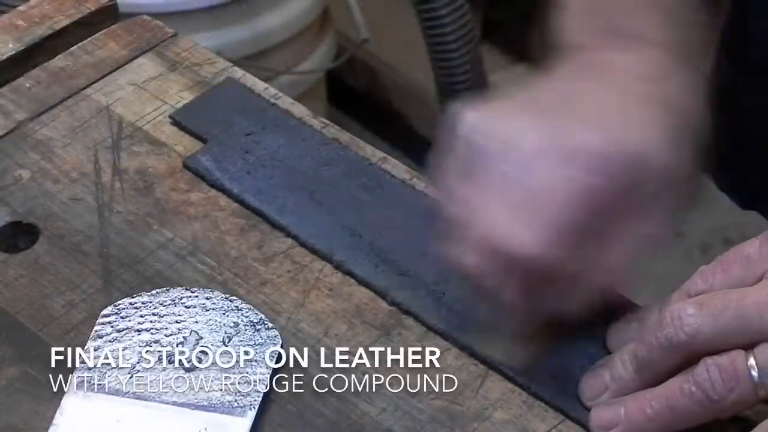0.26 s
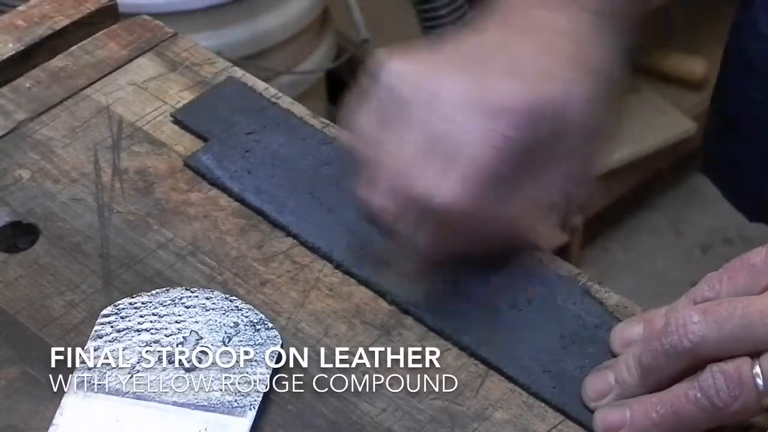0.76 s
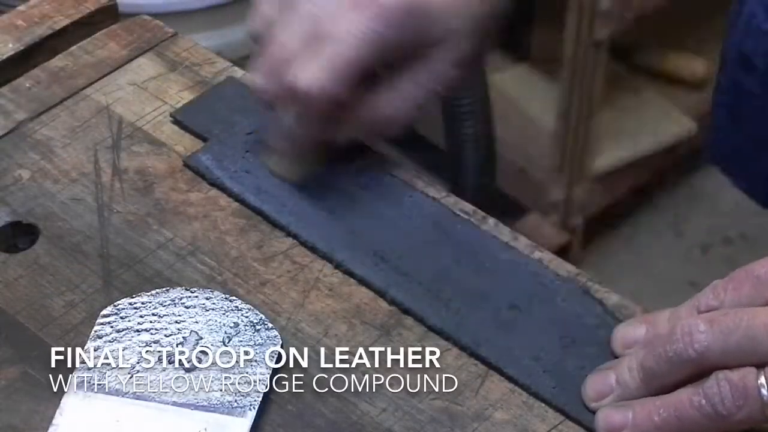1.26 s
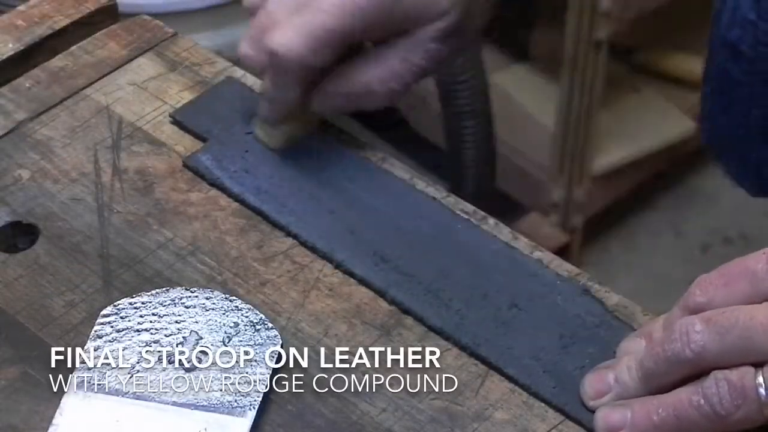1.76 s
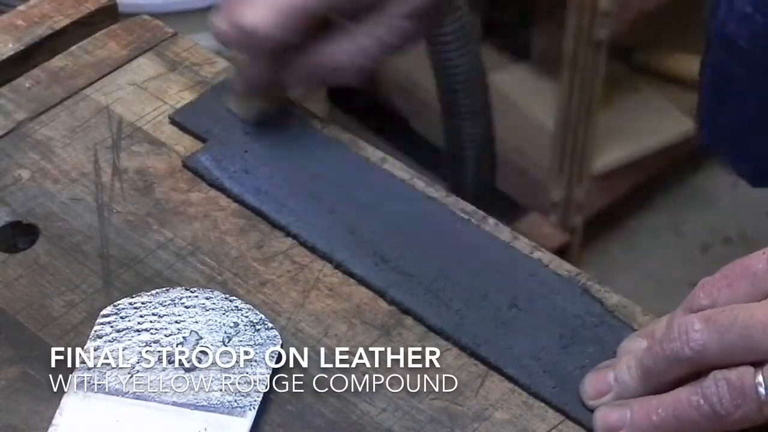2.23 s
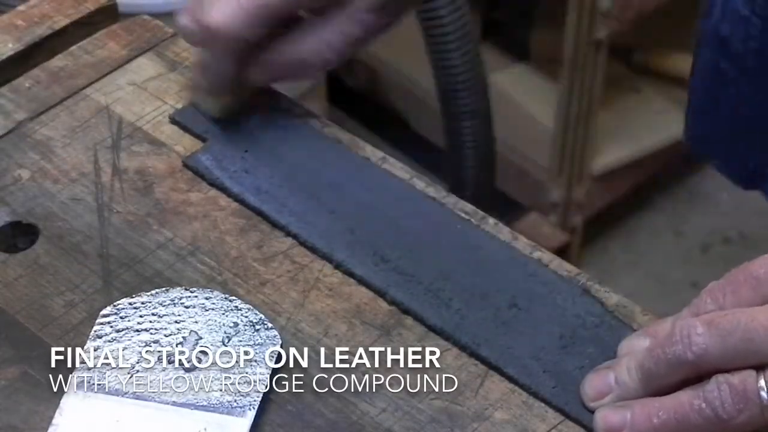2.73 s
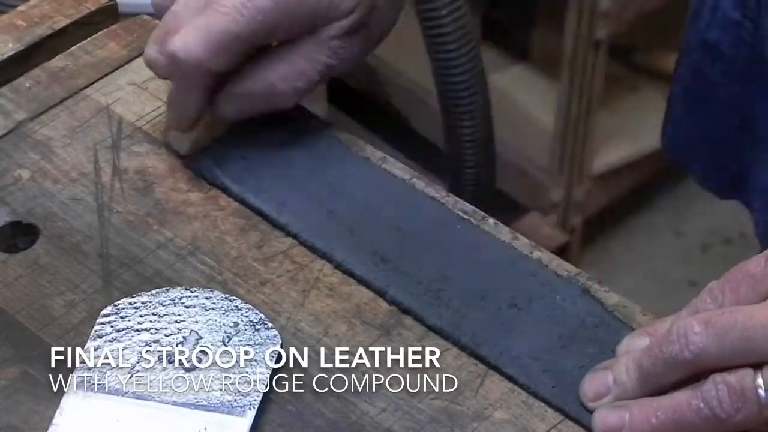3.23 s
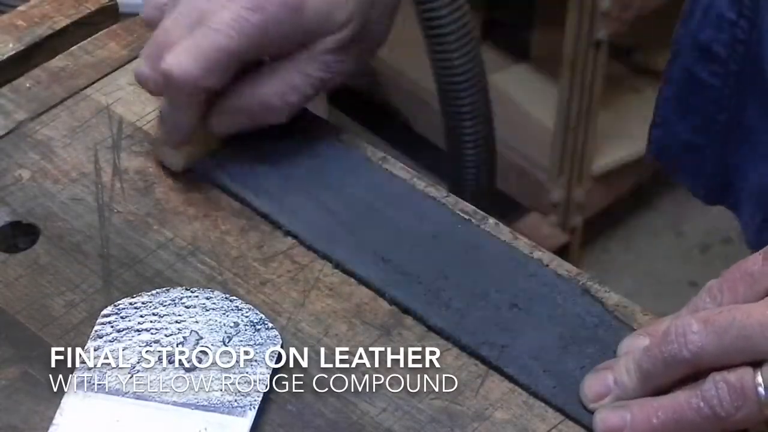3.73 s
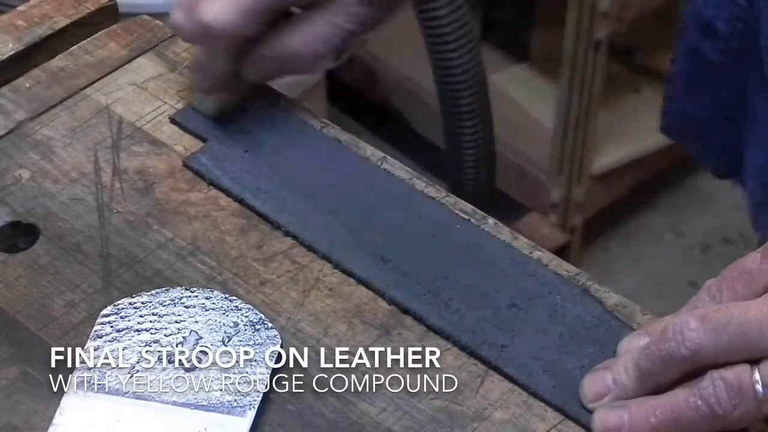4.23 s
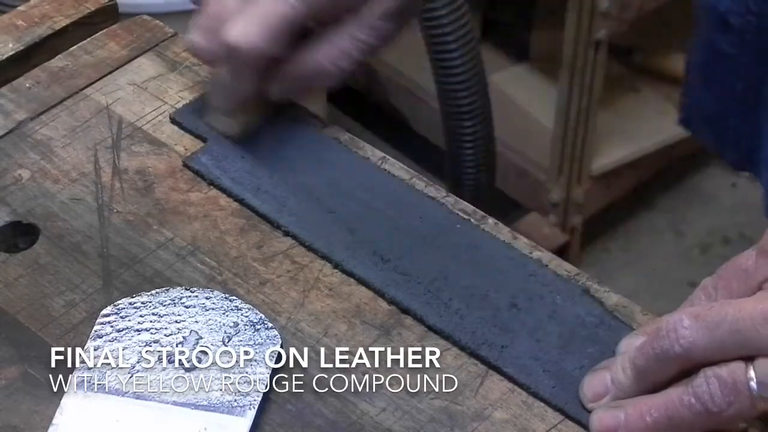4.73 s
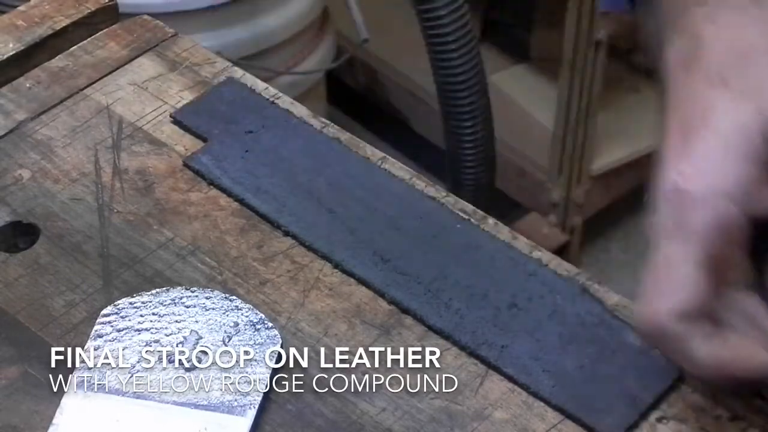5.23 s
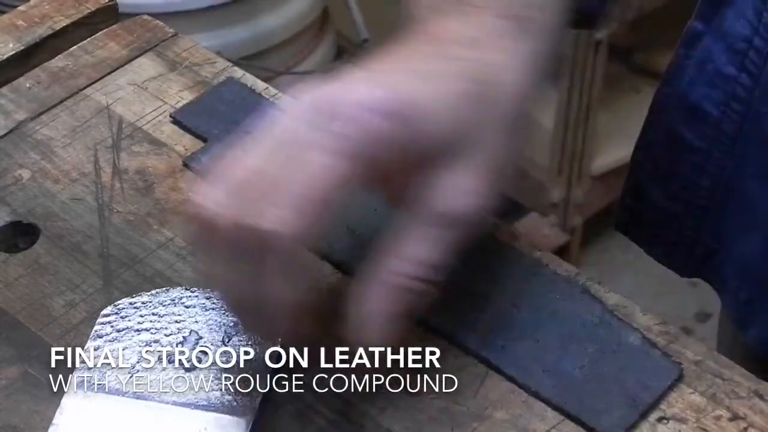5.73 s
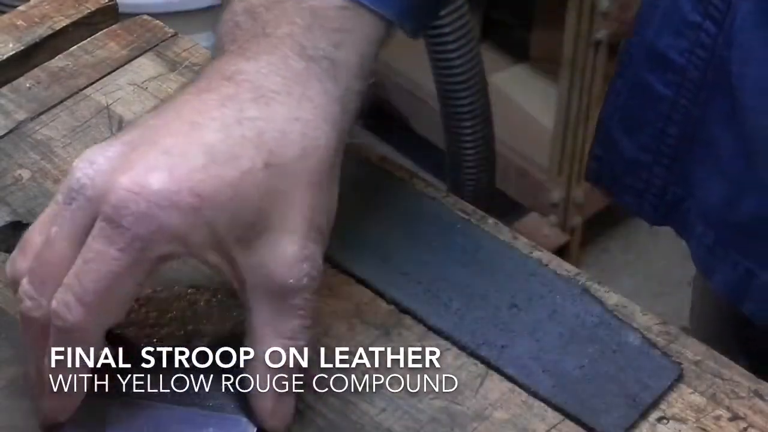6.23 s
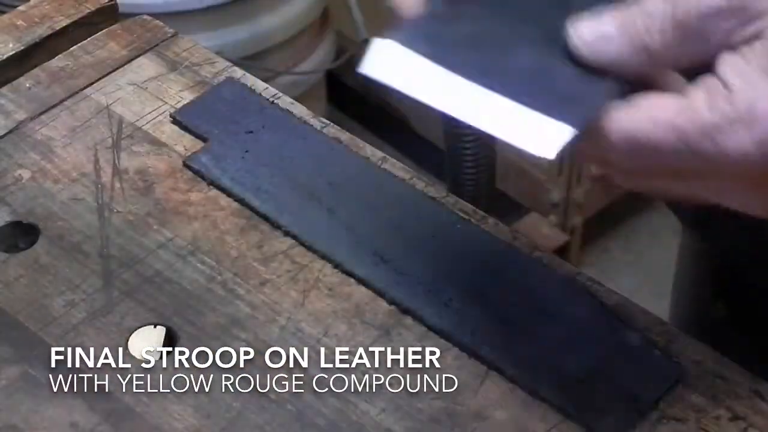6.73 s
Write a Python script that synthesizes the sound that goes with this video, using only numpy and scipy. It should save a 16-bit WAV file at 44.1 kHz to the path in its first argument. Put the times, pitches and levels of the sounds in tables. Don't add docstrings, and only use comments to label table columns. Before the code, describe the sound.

A wax block knocks onto a leather strop about twice a second, each hollow crack followed by a short raspy rub, over steady hum and hiss.

```python
import sys
import numpy as np
from scipy import signal
from scipy.io import wavfile
from scipy.ndimage import uniform_filter1d

SR = 44100
rng = np.random.default_rng(int(sys.argv[2]) if len(sys.argv) > 2 else 0)


def transcribe(signal):
    frames = np.atleast_2d(signal).T
    limited = np.clip(frames, -1, 1)
    pcm = np.round(limited * 32767).astype(np.int16)
    wavfile.write(sys.argv[1], SR, pcm)


def volts(x):
    e = np.asarray(x, float) / 20
    return 10 ** e


N = 307377
TIME = np.arange(N) / SR
EDGES_HZ = 22 * 2 ** np.arange(0, 9.7, .4)

# start in
# seconds, level in dB at each of KNOCK_HZ.
KNOCKS = [(0.7096, -27, -30, -23, -27), (0.951, -81, -41, -45, -56), (1.1138, -34.5, -33, -25, -33),
          (1.542, -32.5, -40.5, -50, -45.5), (2.016, -42.5, -60, -44, -53),
          (2.5272, -29, -27.5, -22.5, -31), (3.003, -27, -26.5, -17.5, -23.5),
          (3.249, -60, -46.5, -49, -54), (3.477, -28, -28, -22.5, -28), (4.0003, -28.5, -26, -25.5, -28.5),
          (4.532, -33.5, -33, -26.5, -45.5), (6.2585, -55, -46.5, -36.5, -57)]
# start in seconds, level in dB at each of CRACK_HZ.
CRACKS = [(0.7097, -22, -18, -22.5, -23), (1.1108, -44, -49, -45, -41), (1.1142, -32, -41, -34.5, -32),
          (1.542, -44, -31.5, -34.5, -33.5), (2.016, -36, -32, -30.5, -28), (2.5255, -43, -39, -33, -36),
          (2.5272, -44, -33, -36, -22.5), (3.003, -26, -21.5, -25.5, -25.5), (3.0046, -22, -25, -27, -26),
          (3.477, -27, -25.5, -31, -28), (3.9988, -29, -54, -42, -47), (4.0005, -41, -33, -26.5, -25),
          (4.5305, -45, -39.5, -45, -46), (4.532, -48, -46, -38, -33)]
# start in seconds, then boom, thud, clack and crack in dB (at BLOW_HZ).
TOUCHES = [(5.775, -48, -38, -37, -46), (5.999, -40, -42.5, -49, -57), (6.01, -58, -46, -49, -75),
           (6.035, -61, -40, -48.5, -41), (6.057, -63, -68, -82, -77), (6.084, -62, -52, -55, -76),
           (6.12, -56, -47.5, -62, -90), (6.144, -57, -56, -91, -74), (6.179, -56, -55, -95, -78),
           (6.287, -60, -71, -87, -75), (6.384, -73, -59.5, -72, -54)]
KNOCK_HZ, CRACK_HZ, BLOW_HZ = [200, 390, 520, 1100], [1400, 2300, 3300, 6000], [190, 450, 1100, 3000]

# pitch in Hz, level in dB, 60 dB decay in seconds.
BENCH = [(156, -3, 0.12), (203.6, 2.5, 0.1), (347.8, -2.5, 0.23), (396.8, 0.5, 0.17), (409.5, -0.5, 0.16),
         (499.2, -0.5, 0.12), (535, -15, 0.024), (716, -4, 0.15), (801, 2, 0.046), (895, -2.5, 0.046),
         (892, -21, 0.26), (1030, -25, 0.034), (1142, -6.5, 0.1), (1251, -0.5, 0.035), (1500, -21, 0.039),
         (1880, -28, 0.41), (2360, -42, 0.062), (2590, -22, 0.2), (2730, -40, 0.13), (3010, -45, 0.09)]
# pitch in Hz, level in dB, 60 dB decay in seconds.
WAX = [(1320, -7, 0.014), (2274, 4, 0.0033), (2810, -20, 0.004), (3400, -20.5, 0.0082), (3950, -8, 0.0069),
       (4900, -10, 0.0069), (6070, -19, 0.0092), (8160, -20, 0.0046), (9260, -21, 0.005)]
# pitch in Hz, level in dB, 60 dB decay in seconds.
TOOL = [(351, -2, 5.0), (670, 5.5, 0.053), (934, -14, 0.25), (1240, 4, 0.046), (1526, -5, 0.15),
        (1910, 1, 0.11), (2040, -14, 0.12), (2240, -22, 0.077), (2580, 5, 0.044), (2800, -18, 0.22),
        (3200, -25, 5.0), (3580, -28, 0.14)]
# pitch in Hz, level in dB, 60 dB decay in seconds.
STROP = [(1131, -2, 0.42), (1236, 4, 0.17), (1544, -18.5, 0.016), (2166, -0.5, 0.093), (3880, -2, 0.033),
         (5820, -2.5, 0.017)]
RING_LATE_S = .0007
BENCH_LATE_S = .0022
RINGS_LOW_HZ = 120

# frequency in Hz, level in dB per Hz.
KNOCK_BODY = [(30, -4), (90, -19), (200, -1), (270, -13), (420, 5.5), (520, -0.5), (620, -8), (800, -9),
              (1110, -4.5), (1600, -23.5), (2600, -12.5), (4000, -23), (7000, -29.5), (12000, -30.5)]
# frequency in Hz, level in dB per Hz.
TOUCH_BODY = [(200, -11.5), (350, -3), (700, -4.5), (1640, -1), (2550, -3.5), (3300, -19), (4300, -41),
              (7000, -50)]
# frequency in Hz, 60 dB decay in seconds.
KNOCK_T60 = [(40, 0.32), (150, 0.51), (500, 0.26), (1500, 0.083), (4000, 0.15), (10000, 0.047)]
# frequency in Hz, left-right likeness from 0 to 1.
SOURCE_ALIKE = [(30, 0.27), (60, 0.5), (250, 0.42), (800, 1), (3000, 0.81), (7000, 0.27), (15000, 0.48)]
LOW_WASH_DB = -8

# start in seconds, length in seconds, hiss in dB, rise from start to end in dB, sag at mid-stroke in dB.
STROKES = [(0.0, 0.12, -47.5, -1, -1.5), (0.237, 0.069, -40.5, 3, -3), (0.404, 0.13, -47, 2, -1.5),
           (0.763, .17, -50.5, 1, -2), (1.181, 0.19, -47.5, 1, 3), (1.61, 0.21, -47.5, -5, 3),
           (2.07, 0.22, -47.5, -1, 3.5), (2.556, 0.2, -46.5, 0.5, 4), (3.045, .21, -50.5, -4, -5),
           (3.543, 0.2, -49.5, -5, -0.5), (4.044, 0.19, -46.5, 0, 5), (4.581, 0.22, -49.5, -3.5, 0)]
# time in seconds, length in seconds, then rasp, scrape and shudder passed into the bench in dB.
BITES = [(0.046, 0.074, -48.5, -55.5, -60), (0.285, 0.056, -43.5, -58, -75), (0.46, 0.063, -48, -57, -61),
         (0.83, 0.11, -51.5, -53.5, -54), (1.247, 0.098, -49, -53.5, -56.5),
         (1.658, 0.1, -50.5, -50.5, -53), (2.17, 0.093, -52.5, -54, -61.5), (2.66, .11, -52, -51.5, -53),
         (3.103, 0.1, -49.5, -50.5, -52), (3.6, .11, -50, -51.5, -52), (4.128, 0.12, -51.5, -51, -52.5),
         (4.648, 0.12, -53, -53, -51)]
# time in seconds, shudder in dB.
JOLTS = [
    (.296, -57),
    (.44, -59),
    (1.385, -52.5),
    (1.83, -80),
    (2.765, -54.5),
    (3.27, -64),
    (3.75, -74),
    (4.25, -59),
    (4.85, -57),
    (4.98, -58),
]
GRIP_DB_PER_S, LIFT_DB_PER_S, ROUND_S = 307, 314, 0.0067
RASP_DROP_DB, SCRAPE_DROP_DB, SHUDDER_DROP_DB = (5, 5.5), (5, 4.5), (6, 5)
RASP_LIFT, SCRAPE_LIFT = 0.71, 0.53
JOLT_S, JOLT_DROP_DB = 0.032, (6, 4)
IDLE_HISS_DB, IDLE_SCRAPE_DB, IDLE_SHUDDER_DB, HANDS_OFF_S = -94.5, -81, -72.5, 4.3
# frequency in Hz, level in dB per Hz.
HISS = [(500, -0.5), (900, -4.5), (1250, -6), (1700, 1), (2300, -4), (3200, -5.5), (4200, 0), (5300, -2),
        (8000, 0), (13000, 0.5), (16000, -2.5)]
# frequency in Hz, left-right likeness from 0 to 1.
RUB_ALIKE = [(600, 0.57), (1400, 0.83), (3000, 0.74), (7000, 0.15), (15000, 0.29)]

# time in seconds, rumble in dB, groan in dB.
SWAYS = [(.33, -68, -63.5), (.8, -70, -59), (1.13, -56, -79), (1.58, -64, -65), (2.05, -68, -85),
         (2.62, -70, -66), (3.1, -63, -59), (3.51, -65, -70), (4.1, -59, -64), (4.6, -65, -82),
         (6.0, -94, -65)]
# frequency in Hz, level in dB per Hz.
ROCK = [(25, -45), (60, 2), (100, 7), (200, -3.5), (280, -20)]
ROCK_REST_DB, SWAY_S, SWAY_DROP_DB = -78.5, 0.15, (14.5, 7)
# time in seconds, hum in dB.
HUM = [
    (0, -60.5),
    (.6, -63.5),
    (.74, -55),
    (1.7, -56.5),
    (2.3, -63.5),
    (2.6, -56),
    (4.95, -56),
    (5.1, -62),
    (6.97, -61),
]
# frequency in Hz, level in dB per Hz.
AIR = [(25, -24), (60, -1), (100, 10.5), (160, -9), (250, -11), (310, -0.5), (400, 7.5), (630, 1),
       (1000, -1.5), (2000, 1.5), (4000, 0), (8500, -2), (10500, -5.5), (16000, -5)]
# frequency in Hz, left-right likeness from 0 to 1.
AIR_ALIKE = [(60, 0.48), (180, 0.1), (550, 0.02), (1650, 0.063), (4970, 0.0083), (15000, 0.092)]
AIR_DB, HUM_HZ = -54, 118.4
CUT_HZ, PORT_DIP_HZ = 15750, 7850


def rms_one(x):
    return x / np.sqrt(np.mean(x ** 2) + 1e-20)


def to_db(gain):
    return 20 * np.log10(gain + 1e-6)


def at_hz(points, hz):
    table = np.array(points)
    return np.interp(np.log(hz), np.log(table[:, 0]), table[:, 1])


def drift(rate):
    r = np.exp(-80 * np.pi * rate / SR)
    slow = signal.lfilter([1], [1, -2 * r, r * r], rng.standard_normal(N // 40 + 2002))[2000:]
    return np.interp(np.arange(N) / 40, np.arange(len(slow)), rms_one(slow))


def hump(s, length, drop_db):
    away = (TIME - s) / length
    side_db = np.where(away < 0, drop_db[0], drop_db[1])
    return volts(-side_db * np.minimum(away ** 2, 20))


def ring(drive, hz, t60):
    r, w = volts(-60 / (t60 * SR)), 2 * np.pi * hz / SR
    return signal.lfilter([0, np.sin(w)], [1, -2 * r * np.cos(w), r * r], drive + 1e-18)


def bands(white, low_hz=0, high_hz=SR):
    for k, (low, high) in enumerate(zip(EDGES_HZ, EDGES_HZ[1:])):
        if low_hz < low < high_hz:
            band = signal.butter(2, [low, high], "band", fs=SR, output="sos")
            yield np.sqrt(low * high), signal.sosfilt(band, white[k % 2])


def spread(pair, likeness, hz):
    alike = np.clip(at_hz(likeness, hz), 0, 1)
    mid, side = np.sqrt(1 + alike) * pair[0], np.sqrt(1 - alike) * pair[1]
    return np.array([np.roll(mid + side, int(hz < 5000)), mid - side])


def clicks(events, gains, late_s=0):
    out = np.zeros(N)
    out[[round((row[0] + late_s) * SR) for row in events]] = gains
    return out


def blow_db(events, hz, at=BLOW_HZ):
    return np.array([np.interp(np.log(hz), np.log(at), parts) for s, *parts in events])


def struck(events, modes, strike_db, shudder=0, luck_db=3.5, swell_cycles=8.1, at=BLOW_HZ, late_s=RING_LATE_S, turn=-1):
    out = 0
    luck = rng.standard_normal((len(events), len(modes)))
    for k, (hz, level_db, t60) in enumerate(modes):
        gains = volts(blow_db(events, hz, at) + level_db + strike_db + luck_db * luck[:, k]) * turn ** k
        blows = clicks(events, gains, late_s=late_s)
        evened = 2 * np.log(1000) * hz / (swell_cycles * SR)
        push = ring(blows, hz, swell_cycles / hz) * evened
        out = out + ring(push + volts(level_db) * shudder, hz, np.clip(t60, .004, .2))
    return out


def knock_wash(touch_db, crack_db):
    out = 0
    for hz, pair in bands(rng.standard_normal((2, 2, N)), low_hz=28, high_hz=11000):
        events, at, lift_db = (KNOCKS, KNOCK_HZ, 0) if hz < 1400 else (CRACKS, CRACK_HZ, crack_db)
        blows = clicks(events, volts(blow_db(events, hz, at) + at_hz(KNOCK_BODY, hz) + lift_db))
        blows += clicks(TOUCHES, volts(blow_db(TOUCHES, hz) + at_hz(TOUCH_BODY, hz) + touch_db))
        fall = volts(-60 / (at_hz(KNOCK_T60, hz) * SR))
        rise = np.exp(-hz / (1.3 * SR))
        wash = signal.lfilter([1 - rise], np.convolve([1, -fall], [1, -rise]), blows + 1e-18)
        level_db = 15.5 + LOW_WASH_DB * (120 < hz < 900)
        out = out + volts(level_db) * wash * spread(pair, SOURCE_ALIKE, hz)
    return out


def strokes():
    hiss, off_db = 0, -60.
    for s, length, level_db, rise_db, sag_db in STROKES:
        along = np.clip((TIME - s) / length, 0, 1)
        before, after = np.maximum(s - TIME, 0), np.maximum(TIME - s - length, 0)
        edge_db = -GRIP_DB_PER_S * before - LIFT_DB_PER_S * after
        path_db = rise_db * (along - .5) - sag_db * np.sin(np.pi * along) ** 2
        hiss = hiss + volts(level_db + path_db + edge_db)
        off_db = np.maximum(off_db, edge_db)
    rasp, scrape, shudder = 0, 0, 0
    for s, length, rasp_db, scrape_db, shudder_db in BITES:
        rasp = rasp + volts(rasp_db) * hump(s, length, RASP_DROP_DB)
        scrape = scrape + volts(scrape_db) * hump(s, length, SCRAPE_DROP_DB)
        shudder = shudder + volts(shudder_db) * hump(s, length, SHUDDER_DROP_DB)
    for s, jolt_db in JOLTS:
        shudder = shudder + volts(jolt_db) * hump(s, JOLT_S, JOLT_DROP_DB)
    resting = uniform_filter1d(1. * (TIME < HANDS_OFF_S), int(.06 * SR))
    creak = volts(IDLE_SCRAPE_DB) * resting
    hiss_db = to_db(uniform_filter1d(hiss, int(ROUND_S * SR)) + volts(IDLE_HISS_DB) * resting)
    rasp_db = to_db(rasp * volts(RASP_LIFT * off_db) + creak)
    scrape_db = to_db(scrape * volts(SCRAPE_LIFT * off_db) + creak)
    shudder_db = to_db(shudder + volts(IDLE_SHUDDER_DB) * resting)
    return hiss_db, rasp_db - hiss_db, scrape_db - hiss_db, shudder_db


def friction(drag, grit_db, flutter_db, patchy_db):
    hiss_db, rasp_db, scrape_db, _ = drag
    grit = rng.standard_normal((2, 2, N)) * volts(grit_db * np.minimum(rng.exponential(1, N), 5))
    out, judder = 0, drift(14)
    for hz, pair in bands(rms_one(grit), low_hz=450):
        low = np.clip(np.log2(3200 / hz), 0, 1)
        high = np.clip(np.log2(hz / 3600) * 0.87, 0, 1)
        bite_db = low * (scrape_db + 6.5) + (1 - low - high) * (rasp_db + 6.0)
        wax = volts(at_hz(HISS, hz) + hiss_db + bite_db + 2.5)
        flicker_db = flutter_db * judder + patchy_db * (1.3 - high) * drift(39.0)
        out = out + wax * volts(flicker_db) * spread(pair, RUB_ALIKE, hz)
    return out


def strop_tone(drag):
    hiss_db, rasp_db, scrape_db, _ = drag
    out, white = 0, rng.standard_normal(N)
    for hz, level_db, t60 in STROP:
        bite_db = scrape_db if hz < 2500 else rasp_db
        gain = volts(level_db - 13.5 + hiss_db + bite_db + 1.4 * drift(7.7))
        out = out + gain * rms_one(ring(white, hz, t60))
    return out


def workshop():
    rumble, groan = 0, 0
    for s, rumble_db, groan_db in SWAYS:
        sway = hump(s, SWAY_S, SWAY_DROP_DB)
        rumble, groan = rumble + volts(rumble_db) * sway, groan + volts(groan_db) * sway
    air, rock = 0, 0
    for hz, pair in bands(rng.standard_normal((2, 2, N))):
        wide = spread(pair, AIR_ALIKE, hz)
        air = air + volts(at_hz(AIR, hz) + 0.6 * drift(1)) * wide
        if hz < 280:
            rocking = volts(ROCK_REST_DB) + (rumble if hz < 125 else groan)
            placed = wide if hz < 90 else np.sqrt(2) * pair[0]
            rock = rock + volts(at_hz(ROCK, hz) + 19.5 + 3.2 * drift(5)) * rocking * placed
    hum_db = np.interp(TIME, *np.transpose(HUM), left=-110, right=-110)
    wander = 0.91 * drift(3.9)
    steady = np.sqrt(2) * np.sin(2 * np.pi * HUM_HZ * TIME + wander)
    throb = rms_one(ring(rng.standard_normal(N), HUM_HZ * 1.036, t60=0.063))
    return volts(AIR_DB) * rms_one(air) + rock + volts(hum_db) * (1.09 * steady + 0.32 * throb)


def scene():
    drag = strokes()
    shudder = volts(drag[3] - 35.0 + 2.94 * drift(16.7)) * rng.standard_normal(N)
    rings = strop_tone(drag)
    rings -= struck(KNOCKS, BENCH[:14], -2.4, shudder, luck_db=0.5, swell_cycles=7.0, at=KNOCK_HZ,
                    late_s=BENCH_LATE_S, turn=0.98)
    rings += struck(CRACKS, BENCH[14:], -1.0, shudder, at=CRACK_HZ)
    rings += struck(CRACKS, WAX, 4.8, luck_db=1.5, swell_cycles=6.5, at=CRACK_HZ)
    rings += struck(TOUCHES, TOOL, -5.0)
    rings += struck(TOUCHES, BENCH[2:9], -6.0, swell_cycles=2.7)
    rings += struck(TOUCHES, WAX[:5], 0.71, swell_cycles=5.9)
    rings = signal.sosfilt(signal.butter(2, RINGS_LOW_HZ, "high", fs=SR, output="sos"), rings)
    bench = np.array([np.roll(rings, 1), rings]) + knock_wash(touch_db=-4.0, crack_db=-2.0)
    bench = bench * volts(np.array([[-.4], [.4]]))
    return bench + friction(drag, grit_db=1.5, flutter_db=1.5, patchy_db=-2.0) + workshop()


def low_pass(x):
    return signal.sosfilt(signal.butter(12, 17000, fs=SR, output="sos"), x)


def record(dry):
    notched = signal.lfilter(*signal.iirnotch(PORT_DIP_HZ, 50.0, fs=SR), dry)
    dipped = dry - 0.86 * (dry - notched)
    cut = signal.sosfilt(signal.ellip(10, .5, 70, CUT_HZ, fs=SR, output="sos"), dipped)
    return low_pass(cut)


dry = scene()
out = record(dry)
transcribe(out)
```